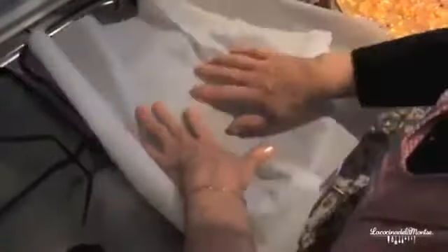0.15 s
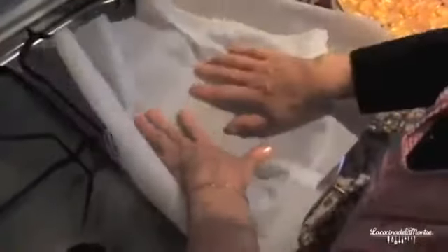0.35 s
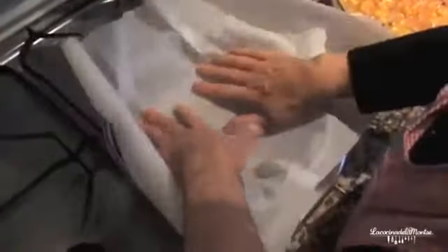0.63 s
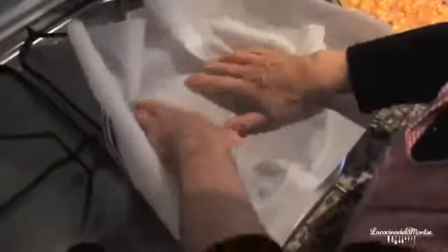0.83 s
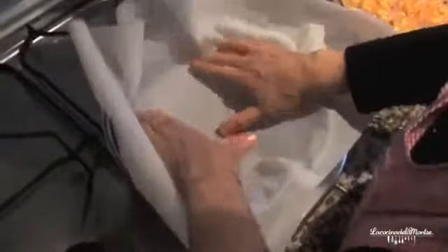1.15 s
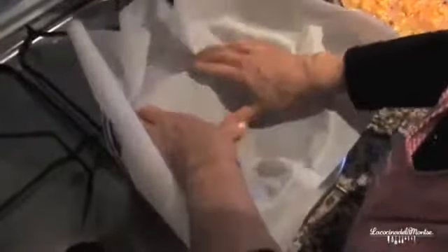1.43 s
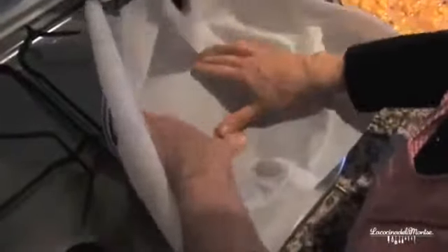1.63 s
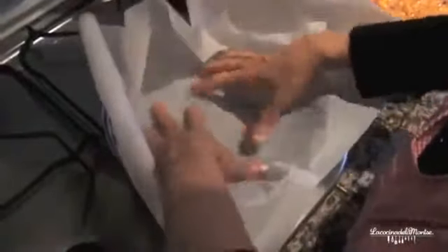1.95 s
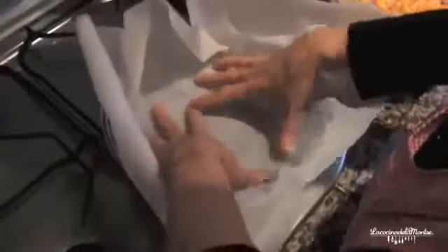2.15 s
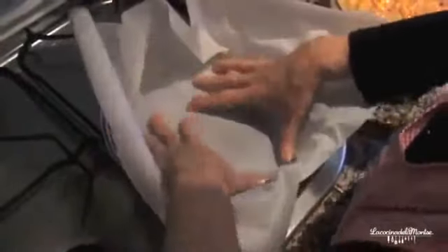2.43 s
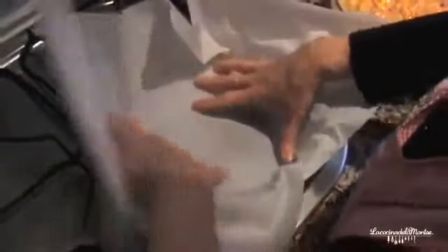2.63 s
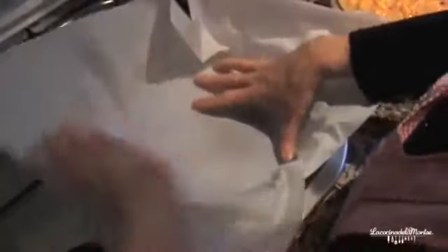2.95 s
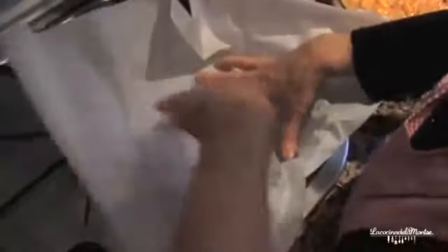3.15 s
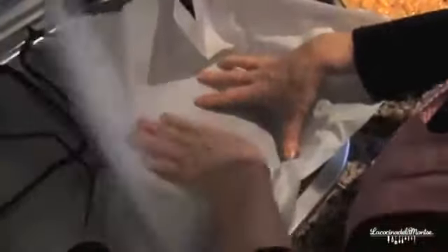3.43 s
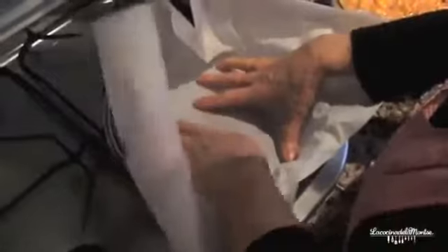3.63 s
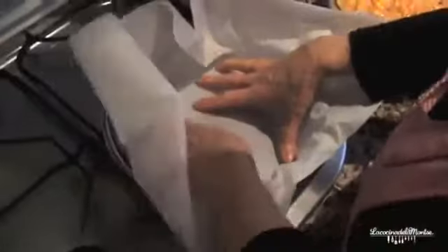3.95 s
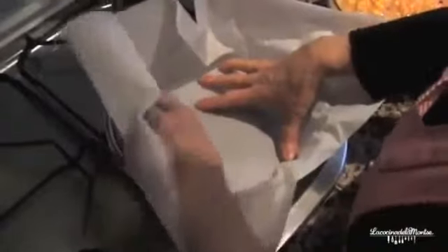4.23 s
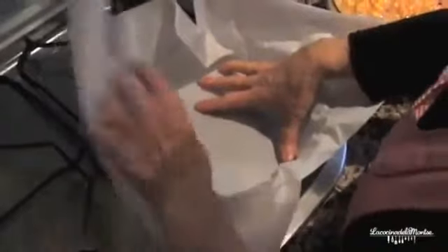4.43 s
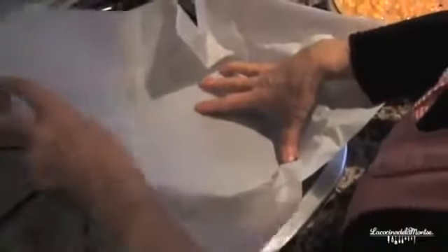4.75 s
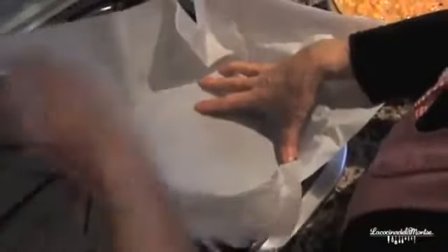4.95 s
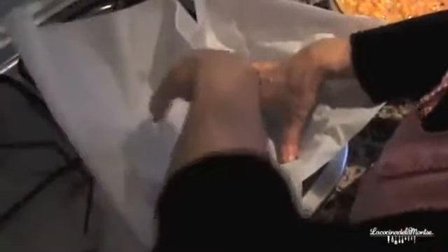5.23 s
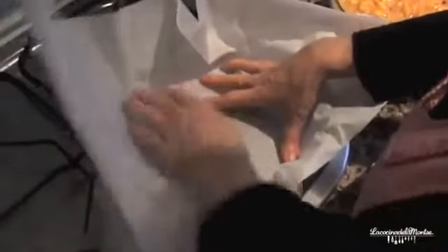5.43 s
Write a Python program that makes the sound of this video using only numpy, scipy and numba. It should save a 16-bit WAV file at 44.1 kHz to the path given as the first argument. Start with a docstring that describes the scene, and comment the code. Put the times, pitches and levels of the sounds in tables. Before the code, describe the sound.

Stiff baking paper crackles loudly and almost nonstop, close up, with sharp snaps and a few dull tin knocks, then fades to near quiet.

```python
"""Stiff baking paper is pressed by two hands into a metal tin on a kitchen worktop, heard close up.
Creases buckle in avalanches of tiny clicks, with hiss from sliding fingers and louder snaps on top.
Now and then the tin knocks on the worktop and rings, as a set of fading vibrations; near the end
a finger faintly grazes its rim. The hard kitchen adds a short tail of echoes over quiet, steady noise."""
import sys
import numpy as np
from scipy import signal
from scipy.fft import rfft, irfft, next_fast_len
from scipy.io import wavfile
from scipy.ndimage import uniform_filter1d
from numba import njit

SR = 44100
rng = np.random.default_rng(int(sys.argv[2]) if len(sys.argv) > 2 else 0)


def transcribe(u):
    """Save the signal u as a 16-bit wav file named by the first command-line argument.

    u: samples, shape (n,) or (channels, n), limited to [-1, 1]; the rate is SR.
    q: integer samples, one column per channel.
    """
    v = np.clip(np.atleast_2d(u).T, -1, 1)
    q = np.round(v * 32767).astype(np.int16)
    wavfile.write(sys.argv[1], SR, q)


def ratio_of_db(decibels):
    """Turn decibels (scalar or array-like) into linear amplitude factors; 0 dB maps to 1."""
    return 10 ** (np.asarray(decibels, float) / 20)


N = 246519  # length in samples

# How hard the hands press. Each row: time in seconds, relative level of the crackle's treble in dB,
# its lows against that treble in dB.
PRESS = [(0.0, -22.5, -5.5), (0.03, -19, -6.5), (0.06, -21.5, -4), (0.25, -19, -7.5), (0.42, -19, -10),
         (0.5, -20.5, -9), (0.625, -18.5, -10.5), (0.656, -25, -12), (0.68, -22.5, -4.5), (0.71, -17.5, -9),
         (0.77, -17.5, -8.5), (0.83, -20.5, -7), (0.89, -16, -13.5), (0.96, -21, -6), (1.03, -19, -11.5),
         (1.1, -21.5, -8), (1.2, -21.5, -9.5), (1.3, -20, -9), (1.45, -20.5, -10.5), (1.54, -18, -7.5),
         (1.6, -20.5, -13), (1.69, -21.5, -7.5), (1.79, -18.5, -11.5), (1.84, -23, -13), (1.9, -19.5, -7),
         (2.03, -23, -11), (2.08, -23.5, -10), (2.14, -19.5, -12.5), (2.18, -22.5, -12.5), (2.24, -24, -11),
         (2.31, -21.5, -8), (2.38, -20, -9.5), (2.45, -18, -12), (2.52, -22.5, -12), (2.57, -26, -8.5),
         (2.61, -20, -10.5), (2.65, -22.5, -13), (2.83, -20, -7), (2.87, -22.5, -7), (2.92, -20.5, -13),
         (3.06, -19.5, -5.5), (3.1, -32, -1), (3.155, -30.5, -6), (3.186, -38.5, -9), (3.2, -24.5, -4),
         (3.23, -36, -7), (3.31, -38.5, -16), (3.385, -51, -18), (3.41, -29, -1.5), (3.46, -60.5, -21),
         (3.5, -41.5, 10), (3.512, -22.5, -8), (3.58, -23, -3.5), (3.65, -20, -9.5), (3.73, -21, -2),
         (3.78, -19, -8), (3.86, -22, -6), (3.96, -17, -10), (4.02, -23.5, -10), (4.22, -22.5, -12.5),
         (4.242, -21.5, -12), (4.3, -20, -14), (4.336, -23.5, -8.5), (4.36, -21, -13.5),
         (4.44, -18.5, -9.5), (4.475, -23.5, -11), (4.6, -28, -9.5), (4.62, -21.5, -6), (4.69, -32, -9),
         (4.73, -29, -4), (4.755, -23.5, -5), (4.78, -28, -10.5), (4.835, -25.5, -7.5), (4.88, -23.5, -9),
         (4.93, -24.5, -11.5), (4.97, -23.5, -3.5), (5.1, -23.5, -12.5), (5.14, -34.5, 3.5),
         (5.25, -40, -7.5), (5.29, -42, -3), (5.32, -56, 2), (5.45, -66.5, 20), (5.5, -67, 11),
         (5.59, -73.5, 10)]
PRESS_USUAL_DB = -20
# Ringing of the tin's rim. Each row: pitch in Hz, relative level in dB, time to fade by 60 dB in seconds.
RIM = [(4620, -4, .07), (5020, 2, .1), (5110, 3, .1), (5590, -1, .08), (6300, -2, .05)]
LEFT_RIGHT = np.array([[1], [-1]])  # adds to the left, takes from the right


def level(x, db):
    """Scale to an rms level in dB."""
    return x * ratio_of_db(db) / np.sqrt(np.mean(x ** 2))


def colour(x, points):
    """Shape the spectrum by (Hz, dB) points."""
    hz, db = np.transpose(points)
    size = next_fast_len(N)
    f = np.maximum(np.arange(size // 2 + 1) * SR / size, 1)
    gain = ratio_of_db(np.interp(np.log(f), np.log(hz), db))
    return irfft(rfft(x, size) * gain, size)[..., :N]


def curve(points, column):
    """One column of a table, joined by straight lines in time."""
    table = np.array(points)
    return np.interp(np.arange(N) / SR, table[:, 0], table[:, column])


def walk(rate_hz):
    """Random levels, rate_hz new ones a second, smoothed twice; spread near 1."""
    steps = rng.standard_normal(600)
    hold = int(SR / rate_hz)
    held = steps[np.arange(N) // hold]
    return 1.3 * uniform_filter1d(uniform_filter1d(held, hold), hold)


@njit
def ring(count, start, turn, fade, size):
    """Sum damped vibrations, each a sine that fades steadily until it has nearly died away."""
    out = np.zeros(count)
    for k in range(len(start)):
        z, p = size[k] + 0j, np.exp(1j * turn[k] - fade[k])
        for i in range(max(start[k], 0), min(count, start[k] + int(6 / fade[k]))):
            z *= p
            out[i] += z.imag
    return out


def clicks(s, hz, cycles, size, place):
    """Buckles that fade to about a third in the given cycles, placed between left (1) and right (-1)."""
    s, hz, size, place = (v.ravel() for v in np.broadcast_arrays(s, hz, size, place))
    start = (s * SR).astype(int)
    turn = 2 * np.pi * np.clip(hz, 50, 11500) / SR
    fade = turn / (2 * np.pi * cycles)
    size = size * np.where(np.arange(len(s)) % 2, 1, -1)  # creases pop up or down
    mid = ring(N, start, turn, fade, size)
    side = ring(N, start, turn, fade, size * place)
    return mid + side * LEFT_RIGHT


def crackle(count=7000, order=8):
    """Avalanches: one crease giving way sets off a few ms of clicks of related pitch."""
    # The sound of the sheet over the hollow tin. Each row: frequency in Hz, relative level in dB per Hz.
    sheet = [(24, -64.5), (40, -21.5), (223, -11), (275, -4), (418, -6.5), (469, -1.5), (515, -5),
             (680, 5.5), (746, 2), (1010, 3), (1330, 0.5), (2030, -1.5), (3790, -7), (6620, -5),
             (10300, -9.5), (13400, -58), (22000, -120)]
    # Fingers creep unevenly: the whole level wavers, and each range on its own.
    waver_db, waver_hz, colour_waver_db, colour_waver_hz = 0.61, 30.03, 1.5, 29.82
    # Middle against treble; lighter pressing is duller.
    middle_db, middle_db_per_db, middle_most_db = -3.5, -0.4, 1

    first, later = rng.random((count, 4)), rng.random((count, order, 4))
    s = N / SR * first[:, :1] - .0025 * np.log(later[..., 0])
    spread = 0.125 * (later[..., 1] + later[..., 2] - 1)
    octave = np.clip(first[:, 1:2] ** 0.597 + spread, 0, 1)
    hz = 60 * 2 ** (7.674 * octave)
    size_db = -2.2 * np.log(first[:, 2:3]) + 6 * later[..., 3]
    most_db = np.where(hz < 500, 8, 13)
    size = ratio_of_db(np.minimum(size_db, most_db)) * (hz / 1000) ** 0.86  # high clicks are short, so start larger
    place = 0.19 * (2 * first[:, 3:] - 1)
    x = clicks(s, hz, 0.91, size, place)

    # Flat facets between creases ring on for a moment.
    facet_size = ratio_of_db(np.minimum(1.5 * size_db[::9, 0], 9)) * hz[::9, 0] ** .4
    facets = clicks(s[::9, 0], np.maximum(hz[::9, 0], 600), 18., facet_size, 0.)
    # Fingers sliding on the sheet fill the gaps with hiss.
    mid, side = rng.standard_normal((2, N))
    slide = level(mid + 0.084 * side * LEFT_RIGHT, -2.0)
    x = colour(level(x, 0) + level(facets, -15.0) + slide, sheet)

    press_db = curve(PRESS, column=1)
    top_db = press_db + waver_db * walk(waver_hz)
    mid_db = np.minimum(middle_db + middle_db_per_db * (press_db - PRESS_USUAL_DB), middle_most_db)
    mid_db = mid_db + colour_waver_db * walk(colour_waver_hz)
    low_db = curve(PRESS, column=2) + .5 * colour_waver_db * walk(colour_waver_hz)
    low = signal.sosfilt(signal.butter(2, 1500, fs=SR, output="sos"), x)
    high = signal.sosfilt(signal.butter(2, 4000, "high", fs=SR, output="sos"), x)
    middle = signal.sosfilt(signal.butter(2, [1500, 4000], "band", fs=SR, output="sos"), x)
    # The middle goes in upside down.
    mix = level(high, -0.33) - ratio_of_db(mid_db) * level(middle, -6) + ratio_of_db(low_db) * level(low, -1.53)
    return ratio_of_db(top_db) * mix


def kitchen():
    """Quiet steady floor: noise shaped in frequency, mostly the same on both sides."""
    # Each row: frequency in Hz, relative level in dB per Hz.
    floor = [(25, -2), (60, -1), (125, 0), (250, -10.5), (350, -3.5), (520, -26.5), (1300, -22.5),
             (3100, -25), (4200, -36), (10300, -43)]
    mid, side = colour(rng.standard_normal((2, N)), floor)
    return level(mid + ratio_of_db(-18.5) * side * LEFT_RIGHT, -53)


def tail(x, size=4096):
    """Worktop, tiles and cupboards: dense echoes, longer in the low part; they change as the hands move."""
    t60_s, low_t60_s = 0.1, 0.25  # time to fade by 60 dB
    tail_db, side_db = -7.5, -9.5
    t = np.arange(SR // 3) / SR
    out = np.zeros((2, N + 2 * size + len(t)))
    for a in range(-size, N, size):  # overlapping pieces, each with fresh echoes
        noise = rng.standard_normal((2, len(t)))
        low = signal.sosfilt(signal.butter(2, 900, fs=SR, output="sos"), noise)
        echo = (noise - low) * ratio_of_db(-60 * t / t60_s) + low * ratio_of_db(-60 * t / low_t60_s)
        echo = echo * np.minimum(t / 0.0024, 1)  # echoes swell over the first 2.4 ms
        piece = (x[max(a, 0):a + 2 * size] * np.hanning(2 * size)[max(-a, 0):N - a])[None]
        wet = signal.fftconvolve(piece, echo / np.sqrt(np.sum(echo[0] ** 2)), axes=1)
        out[:, max(a, 0):max(a, 0) + wet.shape[1]] += wet
    return ratio_of_db(tail_db) * (out[0, :N] + ratio_of_db(side_db) * out[1, :N] * LEFT_RIGHT)


def snap_rows(count=50):
    """Creases at set moments, strong to very faint, then others that buckle at random moments."""
    # Creases at set moments. Each row: time in seconds, relative strength in dB, pitch in Hz,
    # dull flap against the crack in dB.
    set_creases = [(0.0373, -9, 2030, -15), (0.148, -18, 6700, -11), (0.3646, -2, 8100, -13),
                   (0.431, -16, 1950, -21), (0.5184, -8, 7160, -3), (0.532, -10, 1570, -8),
                   (0.5666, -9, 6100, -8), (0.6214, -7, 7600, -24), (0.6769, -19, 3960, -24),
                   (0.694, -10, 6700, -18), (0.8257, -9, 5000, -16), (0.8708, -5, 4830, -26),
                   (0.9457, -9, 2920, -17), (0.9993, -11, 6640, -22), (1.0529, -10, 5800, -4.5),
                   (1.1109, -7, 6300, -30), (1.163, -7.5, 2750, -18), (1.1678, -1, 7300, -24),
                   (1.2844, -11, 6580, -22), (1.3394, -3, 6770, -12), (1.4546, -13, 6650, -24),
                   (1.5214, -9, 4920, -8), (1.5954, -9, 4020, -23), (1.632, -17, 1660, -25),
                   (1.755, -11, 6400, -23), (1.8498, -1.5, 6900, -16), (1.8964, -1.5, 5140, -19),
                   (1.939, -8, 6500, -14), (1.9894, -5, 6550, -22), (2.0467, -1, 7200, -17),
                   (2.1034, -1.5, 8800, -19), (2.1505, -2.5, 6700, -25), (2.1834, -4, 6440, -19),
                   (2.2558, -13, 5040, -12), (2.2832, -16, 5090, -19), (2.3413, -5, 5540, -22),
                   (2.446, -2, 5660, -18), (2.484, -9, 3100, -25), (2.55, -23, 2700, -24),
                   (2.6105, -12, 4500, -22), (2.6913, -6.5, 5000, -17), (2.725, -18, 1760, -25),
                   (2.7741, -15, 6660, -15), (2.8877, -3.5, 6300, -13), (2.926, -13, 1246, -18),
                   (2.9684, -4, 4550, -28), (3.004, -13.5, 1790, -20), (3.1617, -7, 6100, -32),
                   (3.1931, -5, 7660, -19), (3.2345, -9, 6100, -19), (3.257, -17, 5340, -35),
                   (3.261, -6.5, 6600, -37), (3.3174, -11, 4300, -30), (3.3335, -13, 4550, -27),
                   (3.3987, -2.5, 7950, -17.5), (3.4015, -14, 3050, -4), (3.5062, -8, 8330, -24),
                   (3.5164, 0, 6670, -20), (3.5389, -7, 5300, -26), (3.6027, -16, 5200, -13),
                   (3.6426, 0.5, 6800, -18), (3.677, -5, 5160, -16), (3.8066, -12, 5820, -3),
                   (3.8183, 0, 7060, -20), (3.8681, -3, 5300, -16), (3.916, -8, 2810, -20),
                   (4.019, -11.5, 2980, -20), (4.0306, -3, 7030, -13.5), (4.0602, -4, 6800, -4.5),
                   (4.135, -6, 6840, -22), (4.1599, -6, 7900, -25), (4.1784, -23, 6500, -21),
                   (4.1945, -8.5, 2450, -25), (4.215, -15, 1680, -13), (4.246, -13, 1224, -13),
                   (4.262, -15, 1060, -7), (4.283, -15, 2390, -20), (4.3, -7, 6570, -13),
                   (4.3444, -8, 6700, -25), (4.356, -13, 2300, -20), (4.378, -17, 995, -10),
                   (4.407, -8, 6900, -26), (4.43, -20, 1310, -14), (4.5476, -7, 6500, -11),
                   (4.567, -14, 2370, -5), (4.6119, -13, 2370, -24), (4.622, -9, 4900, -19),
                   (4.6344, -11.5, 2310, -23), (4.7002, -19, 2370, -25), (4.7157, -17, 4100, -20),
                   (4.74, -14.5, 2940, -19), (4.749, -4, 7100, -10), (4.7865, -8, 1960, -21),
                   (4.8135, -8, 2300, -23), (4.8424, -13.5, 1660, -15), (4.8504, -12, 3100, -26),
                   (4.8698, -6, 7070, -14), (4.879, -1.5, 6840, -24), (4.889, -12, 7640, -16),
                   (4.904, -16, 5070, -20), (4.913, -14, 860, -13), (4.943, -9, 2750, -22),
                   (4.9511, -4, 5770, -25), (5.0368, -6.5, 4480, -3), (5.0828, -7.5, 5060, -16),
                   (5.1083, -17, 1810, -21), (5.2006, -23, 2860, -20), (5.2194, -24, 1660, -17),
                   (5.239, -17.5, 7000, -18), (5.248, -28.5, 860, -15), (5.27, -31, 914, -17),
                   (5.34, -39, 1260, -11), (5.375, -39, 1520, -10), (5.44, -46, 1000, -14),
                   (5.455, -44.5, 7500, -21.5), (5.583, -48, 2800, -20)]
    # The random ones follow how hard the hands press: most strength over the pressing, and pitch.
    over_press_db, spread_db, top_hz, octaves = 10, 6.5, 7800, 1.3
    flap_db, flap_spread_db = -19, 6
    draw = rng.random((count, 4))
    s = N / SR * draw[:, 0]
    db = curve(PRESS, column=1)[(s * SR).astype(int)] + over_press_db - spread_db * draw[:, 1]
    hz = top_hz * 2 ** (-octaves * draw[:, 2] ** 2)
    flap = flap_db + flap_spread_db * (2 * draw[:, 3] - 1)
    return np.vstack([set_creases, np.transpose([s, db, hz, flap])])


def snaps(order=20, count=150):
    """A burst of clicks around the pitch of the crease, a duller flap, then the sheet shudders out."""
    rows = snap_rows()
    s, peak_db, hz, low_db = np.transpose(rows)[..., None]
    draw, after = rng.random((len(rows), order, 4)), rng.random((len(rows), count, 3))
    place = 0.16 * (2 * draw[:, :1, 1] - 1)
    delay = -.001 * np.log(draw[..., 0] * draw[..., 1]) - .001  # the crease gives way over a few ms
    pitch = hz * 2 ** (0.86 * (draw[..., 2] + draw[..., 3] - 1))
    crack = clicks(s + delay, pitch, 2.5, ratio_of_db(peak_db - 12), place)
    flap_hz = 400 * 2 ** (2.017 * draw[..., 2])
    flap = clicks(s + 1.494 * delay, flap_hz, 2.2, ratio_of_db(peak_db + low_db - 21.0), place)
    # The flat facet beside the crease rings near its pitch.
    facet_hz = hz * 2 ** (.25 * (draw[:, :4, 3] - .5))
    facet = clicks(s + 5 * delay[:, :4], facet_hz, 18, ratio_of_db(peak_db - 14), place)
    # The first break is broad and sharp.
    tick = clicks(s, hz * 2. ** np.arange(-1, 2), 0.53, ratio_of_db(peak_db - 17.0), place)
    late = .07 * after[..., 0]
    shudder_hz = hz * 2 ** (1.78 * (after[..., 1] + after[..., 2] - 1))
    shudder = clicks(s + late, shudder_hz, 0.58, ratio_of_db(peak_db - 14.5 - 60 * late / 0.25), place)
    x = crack + flap + facet + tick + shudder
    return signal.sosfilt(signal.butter(2, 260, "high", fs=SR, output="sos"), x)  # a thin sheet: little bass


def knocks(order=16):
    """The tin lands and chatters for some ms; every contact drives the tin anew, the rim a little less;
    the worktop's boom comes mostly from the first."""
    # Tin landing. Each row: time in seconds, relative strength in dB, ring of the rim in dB,
    # boom of the worktop in dB.
    landings = [(1.897, -12, 5, -4), (1.938, -22, -11, -5), (2.255, -15.5, 9.5, -1.5), (2.296, -14, -3, -9),
                (2.339, -30, -8, 2.5), (2.726, -36, 7, 3.5), (3.675, -12.5, 8.5, -5), (3.693, -18.5, -5, 3),
                (3.762, -17.5, -7, -4), (4.268, -36, -6, 1.5), (5.236, -37, -10, -5), (5.46, -58, -13, 10)]
    # Tin and worktop. Each row: usual pitch in Hz, relative level in dB, time to fade by 60 dB in seconds.
    body = [(69.6, -9.5, 0.33), (93, -3, 0.35), (113, 2.5, 0.4), (128.1, 1, 0.49), (181.3, -1, 0.19),
            (248, -1, 0.069), (330.4, -1.5, 0.19), (386, -7.5, 0.17), (490, -8, 0.24), (678, 6, 0.074),
            (745, 4.5, 0.077), (953, 3, 0.085), (1134, -3, 0.16)]
    s, peak_db, rim_db, boom_db = np.transpose(landings)[..., None, None]
    hz, db, t60 = np.transpose(body + RIM)
    draw = rng.random((len(landings), order, 1 + 2 * len(hz)))
    later = np.arange(order)[:, None] > 0
    late = .06 * draw[..., :1] * later
    boom = hz < 150
    start = s + late + .012 * boom  # the worktop's slow modes come 12 ms after the contact
    on_rim = np.arange(len(hz)) >= len(body)
    rim_gain_db = on_rim * (rim_db - 3.9 * later)
    boom_gain_db = boom * (boom_db + 4.5 - 20 * later)  # later chatter hardly moves the worktop
    size_db = peak_db + db + rim_gain_db + boom_gain_db - 15.0 - 60 * late / 0.17
    size = ratio_of_db(size_db) * np.where(boom, 1, np.sign(draw[..., 1::2] - .5))
    # The hands load the tin differently each time, so the modes shift, the rim least.
    shift = np.where(on_rim, .006, np.where(boom, .02, .13))
    turn = 2 * np.pi * hz / SR * (1 + shift * (2 * draw[..., 2::2] - 1))
    fade = np.log(1000) / (t60 * SR) + 0 * turn
    return ring(N, (start * SR).astype(int).ravel(), turn.ravel(), fade.ravel(), size.ravel())


def graze():
    """A finger grazes the rim: faint friction noise excites the rim modes."""
    # Each row: time in seconds, relative level in dB.
    strokes = [(5.3, -66), (5.35, -61), (5.4, -61), (5.44, -55), (5.46, -56), (5.48, -62), (5.53, -69),
               (5.59, -76)]
    t, db = np.transpose(strokes)
    noise = rng.standard_normal(N)
    x = sum(signal.lfilter(*signal.iirpeak(hz, 70, SR), noise) for hz, _, _ in RIM[1:4])
    return level(x, 0) * ratio_of_db(np.interp(np.arange(N) / SR, t, db, -120, -120))


def scene():
    """Paper and tin, direct and through the room, over the kitchen's floor."""
    tin_pan_db = 1.5  # the tin stands a little to the left
    near = crackle() + snaps() + knocks() * ratio_of_db(tin_pan_db * LEFT_RIGHT) + graze()
    return (near + tail(near.mean(axis=0))) * ratio_of_db(0.22 * LEFT_RIGHT) + kitchen()


def band_limit(x):
    """A steep low-pass at the top of the band."""
    return signal.sosfilt(signal.butter(12, 11610, fs=SR, output="sos"), x)


def record(dry):
    """Brief dropouts, thin bass, two close microphone ports, soft rounding of peaks, a steep top."""
    # The sound drops out briefly. Each row: start in seconds, end in seconds, level in dB.
    dropouts = [(3.391, 3.396, -30), (3.499, 3.503, -22)]
    # Width of the stereo microphone. Each row: frequency in Hz, gain of the left-right difference in dB.
    width = [(60, 0.5), (300, 0), (600, 2), (1000, 0.5), (2200, 6.5), (5000, 0.5), (8500, 5)]
    for a, b, db in dropouts:
        dry = dry * ratio_of_db(np.interp(np.arange(N) / SR, [a - .008, a, b - .002, b], [0, db, db, 0]))
    top = signal.ellip(12, .3, 80, 10283, fs=SR, output="sos")  # lets through up to 10283 Hz
    x = signal.sosfilt(signal.butter(2, 45, "high", fs=SR, output="sos"), dry)
    mid, side = (x[0] + x[1]) / 2, (x[0] - x[1]) / 2
    x = signal.sosfilt(top, mid + colour(side, width) * LEFT_RIGHT)
    x = np.tanh(1.2 * x) / 1.2
    return band_limit(signal.sosfilt(top, x))


dry = scene()
out = record(dry)
transcribe(out)
```